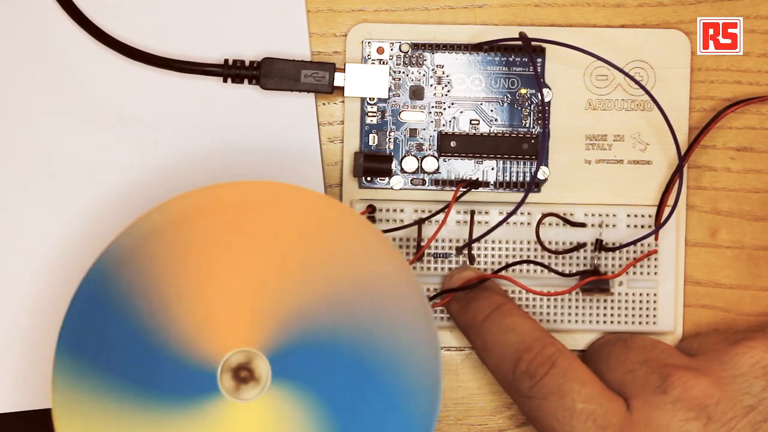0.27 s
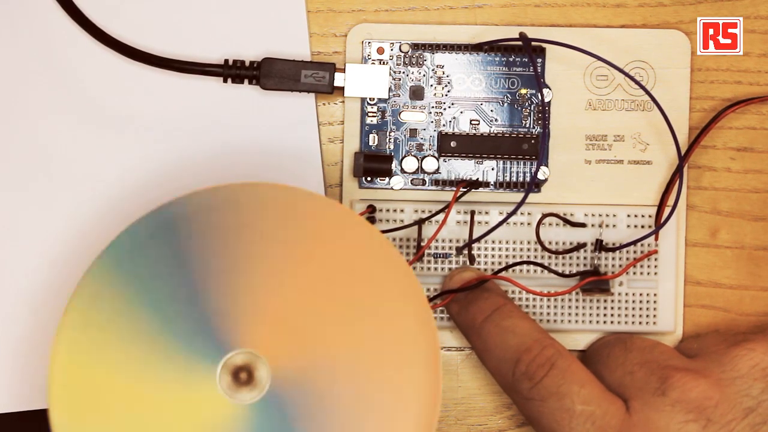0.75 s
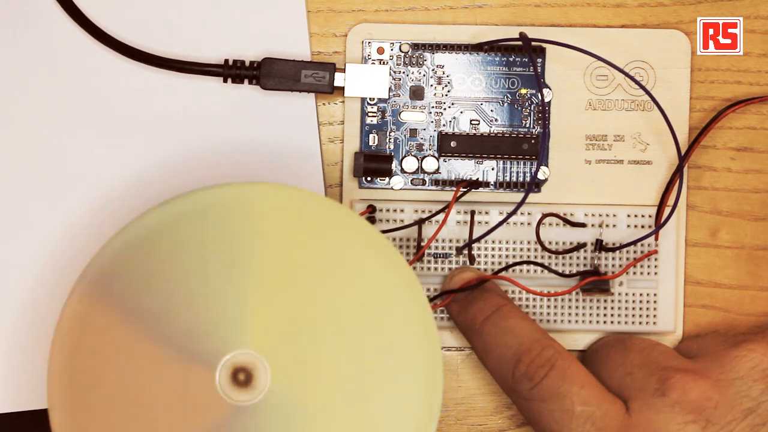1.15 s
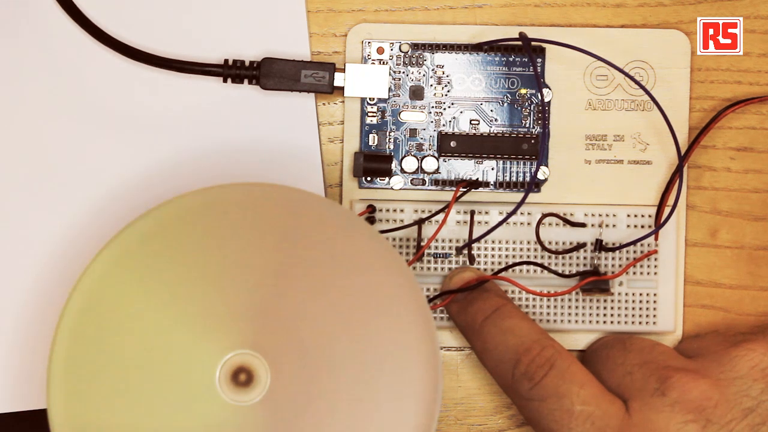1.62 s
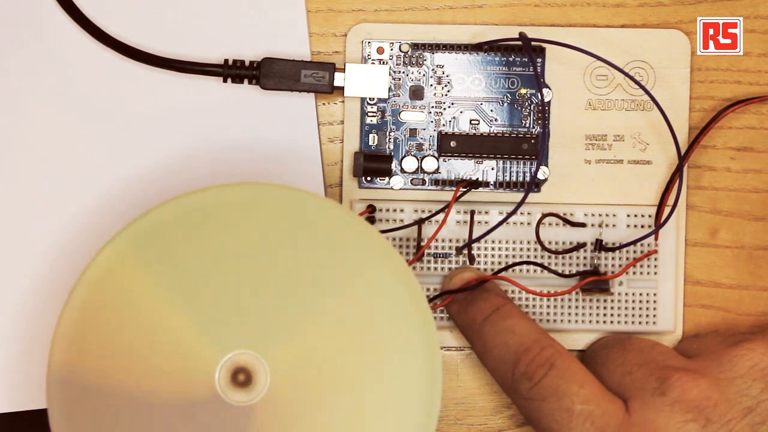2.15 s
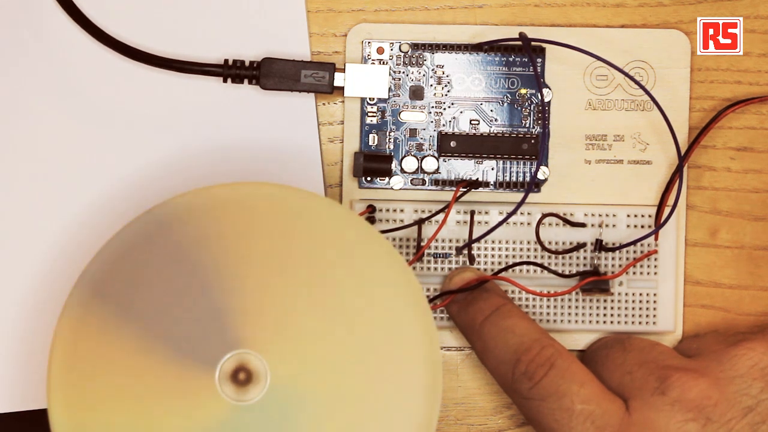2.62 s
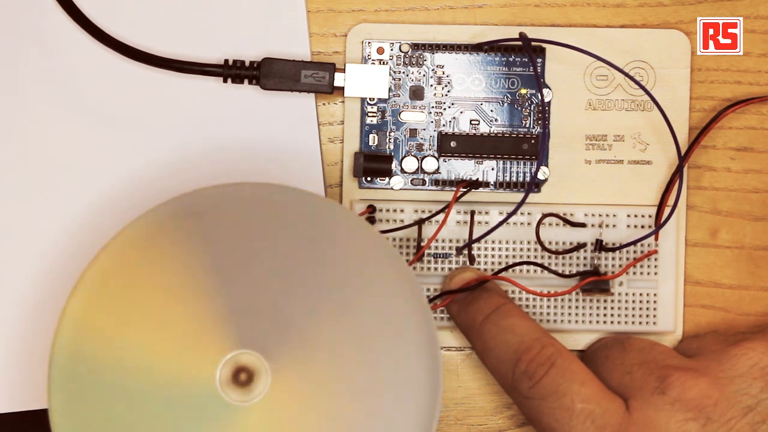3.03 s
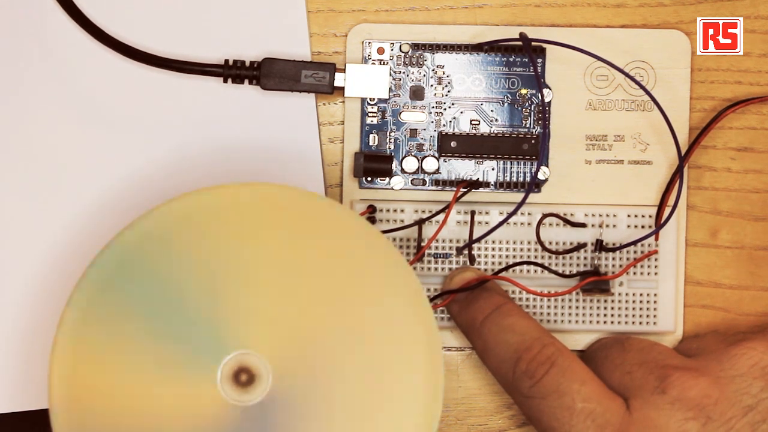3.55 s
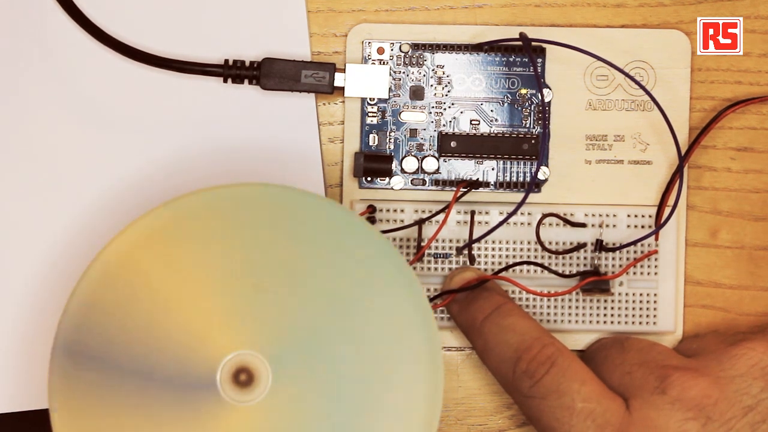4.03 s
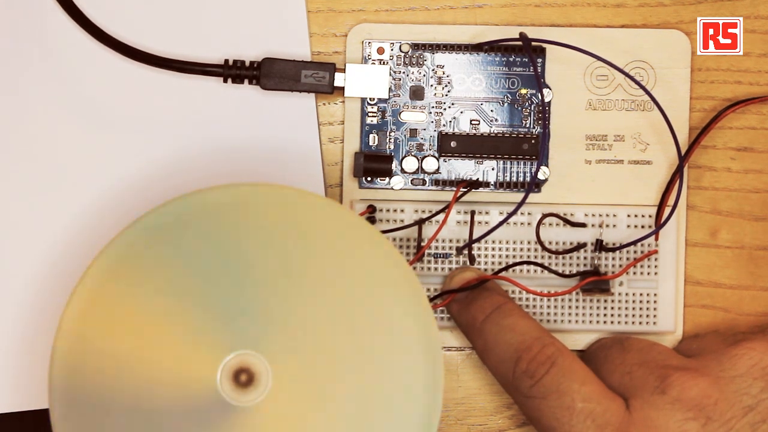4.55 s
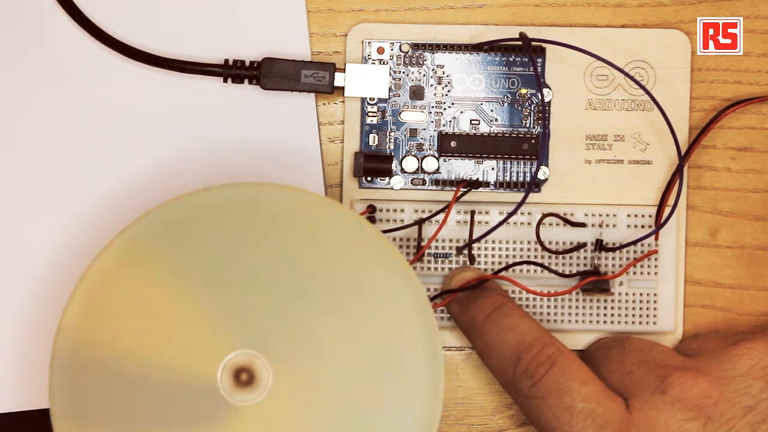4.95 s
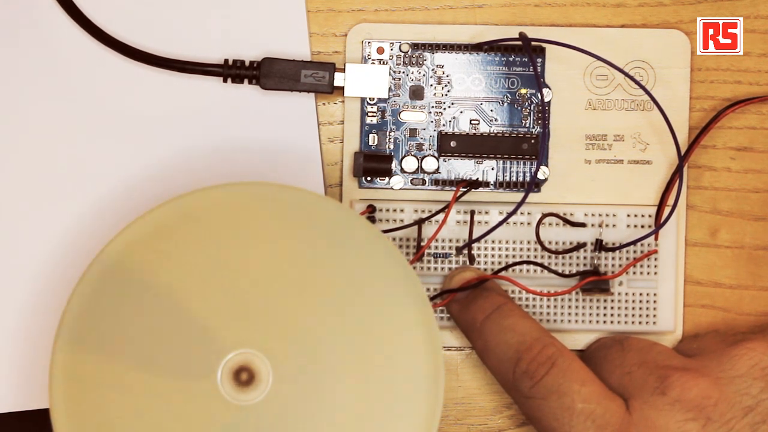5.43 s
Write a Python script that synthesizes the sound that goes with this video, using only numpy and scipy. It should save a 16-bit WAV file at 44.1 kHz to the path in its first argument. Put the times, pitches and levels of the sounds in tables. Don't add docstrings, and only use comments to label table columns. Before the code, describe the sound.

From 0 to 1.24 s a small electric motor starts a light disc slipping on its shaft. A loud, nasal, harmonic-rich squeal near 700 Hz creeps to about 728 Hz, brightening, its throb accelerating from about 3 to 19 pulses a second, with rough friction scrapes and rising brush hiss. At 1.24 s the hub grabs: the squeal drops and stops with a dull, quiet thud, a faint groan and a short dying ring. The motor bogs, then from 1.36 to 1.6 s its tones sweep quickly upward. After that a quieter, steady buzzing whine remains, with fine high lines around 10-12 kHz, airy hiss, a low hum near 450 Hz falling gradually below 400, and grainy hub rattle fluttering 20 to 40 times a second. The whine sags slightly in pitch. From about 4.1 s light knocks and ticks grow clearer. It is still running when it ends at 5.7 s. Close, dry, faint room rumble.

```python
import sys
import numpy as np
from scipy import signal
from scipy.fft import rfft, irfft
from scipy.io import wavfile

SR = 44100
rng = np.random.default_rng(int(sys.argv[2]) if len(sys.argv) > 2 else 0)


def bounce(signal):
    frames = np.transpose(np.atleast_2d(signal))
    limited = np.clip(frames, -1, 1)
    pcm = np.round(limited * 32767).astype(np.int16)
    wavfile.write(sys.argv[1], SR, pcm)


def rack_gain(trim_db):
    fader = np.asarray(trim_db, float)
    return 10 ** (fader / 20)


N = 250488
TIME_S = np.arange(N) / SR
START_N = round(1.3 * SR)
CATCH_S = 1.243
GRIP_S = 1.36
KNOCK_FROM_S, KNOCK_RISE_S = 4.13, .62


def rms_one(x):
    return x / np.sqrt(np.mean(x ** 2) + 1e-20)


def in_time(rows):
    s, *columns = np.transpose(rows)
    return [np.interp(TIME_S, s, c) for c in columns]


def ramp(start_s, length_s):
    return np.clip((TIME_S - start_s) / length_s, 0, 1)


def swell(s, at_s, length_s):
    return np.exp(-((s - at_s) / length_s) ** 2)


def peak(hz, top_hz, width_hz):
    return 1 / (1 + (2 * (hz - top_hz) / width_hz) ** 2)


def angle(hz):
    return 2 * np.pi * np.cumsum(hz) / SR


def drift(rate_hz, at=np.arange(N)):
    r = np.exp(-40 * np.pi * rate_hz / SR)
    chance = rng.standard_normal(at[-1] // 20 + 3002)
    slow = rms_one(signal.lfilter([1], [1, -2 * r, r * r], chance)[3000:])
    return np.interp(at / 20, np.arange(len(slow)), slow)


def coloured(spectrum):
    hz = np.arange(1, N // 2 + 2) * SR / N
    top_hz, db = np.transpose(spectrum)
    shape = rack_gain(np.interp(np.log(hz), np.log(top_hz), db, -90, -90))
    return rms_one(irfft(rfft(rng.standard_normal(N)) * shape, N))


def resonate(x, hz, width_hz):
    r = np.exp(-np.pi * width_hz / SR)
    poles = [1, -2 * r * np.cos(2 * np.pi * hz / SR), r * r]
    return signal.lfilter([(1 - r * r) / 2, 0, (r * r - 1) / 2], poles, x)


def room_air():
    # f/Hz, level/dB per Hz
    air = [(10, -50), (20, -24), (45, -20), (64, -14), (78, -5), (95, -4), (115, -8), (125, -15),
           (200, -13), (300, -15), (450, -22), (900, -60)]
    return rack_gain(-66.5) * coloured(air)


def mains_hum():
    return rack_gain(-67 + 2.9 * drift(1.7)) * np.sin(angle(np.full(N, 100)) + .5 * drift(.64))


def rumbles():
    # t/s, length/s, level/dB
    passes = [
        (0.69, 0.14, -65.5),
        (2.038, 0.12, -61.5),
        (2.287, 0.12, -57.5),
        (2.488, 0.12, -61.5),
        (4.84, 0.16, -59.5),
        (5.35, 0.23, -68),
    ]
    gain = sum(rack_gain(db) * swell(TIME_S, at_s, length_s) for at_s, length_s, db in passes)
    band = signal.butter(3, [160, 390], "band", fs=SR, output="sos")
    return gain * rms_one(signal.sosfilt(band, rng.standard_normal(N)))


def room_tail(x):
    t60_s = .22
    s = np.arange(round(.4 * SR)) / SR
    tail = rng.standard_normal(len(s)) * rack_gain(-60 * s / t60_s) * (s > .004)
    tail = signal.lfilter([.5], [1, -.6], tail)
    return signal.fftconvolve(x, tail / np.sqrt(np.sum(tail ** 2)))[:N]


def edge_tone():
    # t/s, f/Hz, level/dB
    tone = [
        (0, 875, -47),
        (.07, 885, -69),
        (.12, 925, -62),
        (.35, 965, -72),
        (.6, 1000, -69),
        (1.0, 1035, -80),
        (1.24, 1050, -74),
        (1.26, 1050, -100),
    ]
    hz, level_db = in_time(tone)
    return np.sqrt(2) * rack_gain(level_db + 3 * drift(5.7)) * np.sin(angle(hz) + 1.1 * drift(21))


def taps(disc):
    # taps per turn, disc angle/rad, ring f/Hz, width/Hz, peak level/dB
    hub_taps = [
        (1, 5.8, 1450, 90, -58),
        (2, 0.3, 2983, 154, -60),
    ]
    out = 0
    for per_turn, rad, hz, width_hz, db in hub_taps:
        clicks = np.diff(np.floor(round(per_turn) * (disc - rad) / (2 * np.pi)), prepend=0) > 0
        strength = rack_gain(db + 3.1 * rng.standard_normal(N)) * ramp(KNOCK_FROM_S, KNOCK_RISE_S)
        hits = clicks * strength * SR / (np.pi * width_hz) + 1e-18
        out = out + 2.7 * resonate(resonate(hits, hz, width_hz), hz, width_hz)
    return out


def rattle(disc, level_db):
    # f/Hz, width/Hz, level/dB
    body = [(496, 317, 0), (965, 138, -3), (1400, 564, 5.5), (1755, 820, -3.5), (2140, 330, -1.5),
            (2798, 580, -0.5), (3730, 490, -14), (4520, 470, -12), (5370, 400, -14.5), (6520, 380, -5)]
    coupled = TIME_S > 1.25
    knocks_per_s = 1000
    knocks = rng.standard_normal(N) * (.48 + 2 * (rng.random(N) < knocks_per_s / SR))
    throb_db = 1.5 * (np.cos(disc + 2.95) + np.cos(2 * disc + 2.96))
    knocks *= rack_gain(throb_db + 1.05 * drift(41))
    rings = []
    for k, (hz, width_hz, db) in enumerate(body):
        ring = resonate(resonate(knocks, hz, width_hz), hz, width_hz)
        rings.append((-1) ** k * rack_gain(db) * ring * np.sqrt(300 / width_hz))
    for k in range(5, len(body)):
        tick_rad = .25 if k == 5 else 5
        rings[k] *= 1 + coupled * 1.7 * np.exp(4 * (np.cos(disc - tick_rad) - 1))
    knock = .55 * ramp(KNOCK_FROM_S, KNOCK_RISE_S)
    rings[2] *= 1 + knock * (2 * np.exp(3.4 * (np.cos(disc) - 1)) - .5)
    rings[5] *= 1 + .6 * knock * np.cos(2 * disc - 1.1)
    rings[0] *= .25 + .75 * coupled
    rings[1] *= .3 + .7 * coupled
    return rack_gain(level_db) * rms_one(sum(rings))


def chafes():
    # t/s, peak level/dB
    rubs = [(0.0209, -49), (0.0463, -38), (0.12, -42), (0.1476, -40), (0.198, -29), (0.2394, -44),
            (0.3012, -49), (0.3501, -33), (0.4673, -34), (0.5293, -39), (0.6, -29), (0.6528, -45),
            (0.6893, -41), (0.7546, -44), (0.8047, -45), (0.84, -25), (0.907, -20), (0.9685, -19),
            (0.995, -34), (1.0365, -10), (1.0709, -29), (1.1004, -12), (1.132, -30), (1.1827, -38),
            (1.2071, -13)]
    delay_s, length_s = .004, .006
    gain = sum(rack_gain(-52 + .55 * (db + 35)) * swell(TIME_S[:START_N], at_s + delay_s, length_s)
               for at_s, db in rubs)
    return np.pad(gain, (0, N - START_N))


def brushes(rate_hz, disc, level_db, gripped):
    # f/Hz, level/dB per Hz
    spectrum = [(2650, -33), (4500, -6), (5000, -26), (5440, -5), (6540, -3), (6960, -2.5), (7530, -3.5),
                (8240, -2.5), (9900, -1), (10400, 4.5), (11500, 4), (14400, -9.5), (15800, -2)]
    # depth 0-1, f/Hz, width/Hz
    dull_spots = [(.55, 8250, 450), (.5, 7050, 300)]
    step = angle(rate_hz)
    pulse = 1 + .13 * np.sin(step) + .45 * np.sin(2 * step)
    hiss = rms_one(pulse * coloured(spectrum))
    fill, thinning = .57 * resonate(hiss, 11700, 13000), .5 * resonate(hiss, 9100, 2800)
    hiss += gripped * (fill - thinning)
    for depth, hz, width_hz in dull_spots:
        hiss -= depth * resonate(hiss, hz, width_hz)
    throb_db = -2 * gripped * np.cos(disc + .5)
    return (rack_gain(level_db + throb_db + .5 * drift(28)) + chafes()) * hiss


def low_tones(rate_hz, disc_hz):
    # multiple of commutator rate, of disc speed, early level/dB, late level/dB
    beats = [(2, -3, -22, -17), (2, -1, -20, -14), (2, 0, -17, -15), (2, 1, -10, -14), (2, 2, -18, -13),
             (3, -3, -19, -10), (3, -2, -19, -11), (3, 2, -16, -18), (7, -7, -14, -7), (8, -8, -18, -11),
             (4, -2, -18, -18), (4, -3, -15, -18), (4, 1, -16, -14), (6, -2, -10, -26), (6, -1, -13, -16),
             (6, 0, -3, -10), (6, 1, -14, -11), (6, 2, -17, -12), (12, -1, -19, -15), (12, 1, -19, -15)]
    # multiple of flutter, of hub tone, level/dB
    mixes = [(2, 0, -10), (1, 1, -6), (-1, 2, -6)]
    hub_hz = 2 * (rate_hz - disc_hz)
    hub_db = -54.5 + .35 * drift(1.3) + .8 * drift(12)
    octave_db = -67 + 9 * peak(2 * hub_hz, 815, 60) + 2.6 * drift(10)
    fade_db = np.minimum(2 * np.maximum(TIME_S - 1.69, 0) ** 2, 16.5)
    flutter_gain = ramp(1.41, .25) * rack_gain(-57.5 - fade_db)
    late = ramp(1.5, 3.2)
    motor, disc, hub = angle(rate_hz), angle(disc_hz), angle(hub_hz)
    flutter = .769 * hub
    out = rack_gain(hub_db) * np.sin(hub) + rack_gain(octave_db) * np.sin(2 * hub) + flutter_gain * np.sin(flutter)
    for k, m, early_db, late_db in beats:
        beat_db = -65.5 + 10 * ramp(1.25, .25) + early_db + (late_db - early_db) * late
        out += rack_gain(beat_db + 1.5 * drift(3)) * np.sin(k * motor + m * disc + .25 * drift(8))
    for k, m, db in mixes:
        out += flutter_gain * rack_gain(db + drift(1)) * np.sin(k * flutter + m * hub + 1.6 * drift(6.1))
    return np.sqrt(2) * out


def whine(rate_hz, disc, level_db):
    # f/Hz, width/Hz, level/dB
    casing = [(740, 100, -14), (1480, 150, -12), (2200, 150, -20), (2900, 400, -20), (4400, 300, -25),
              (6600, 300, -15), (7350, 120, -7), (8800, 1100, -11), (10550, 300, 0), (11250, 350, -2),
              (12100, 400, -4), (13300, 800, -9), (15000, 1300, -11)]
    # multiple, early level/dB, late level/dB
    odd_ones = [(3, 3, 4), (14, -8, -8), (15, -6, -2), (16, -8, -8), (17, -9, -9), (19, -8, -8),
                (20, -8, -8), (21, -10, -8), (22, -8, -6), (27, 1, -3), (28, -8, -2), (30, -2, 1),
                (33, -3, 3), (35, 0, -3), (40, 0, -5), (41, -4, 0), (46, -3, -3), (53, -2, -2), (39, 4, 2),
                (50, -3, 0), (55, -1, 4), (56, -2, -5), (61, -5, -1), (63, -5, -3), (31, 7, -1),
                (37, -2, -4), (38, -4, -2), (49, -8, -4), (58, -6, -7), (4, -14, -10), (5, -14, -12),
                (6, -25, -25), (12, -5, -5), (7, -6, -6), (8, -8, -8), (9, 3, 10), (11, -6, -6),
                (29, 2, -8), (34, -5, -1), (42, 5, -2), (43, 5, 0), (45, 5, 5), (47, -4, 7), (48, -5, -4),
                (51, -2, 8), (52, -3, -2), (54, 1, 0), (57, -4, 1), (60, -1, -2)]
    # multiple, t/s, length/s, level/dB
    passing = [(29, 3.2, 1.0, -9), (34, 3.2, .7, -11), (37, 3.3, .7, -10), (58, 3.3, .8, -9),
               (61, 2.9, .6, -6), (62, 2.9, .4, -8), (30, 3.6, .6, 3), (31, 3.5, .5, 3), (33, 4.3, .8, 2),
               (33, 1.9, .5, -4), (53, 4.0, .6, 5), (53, 5.2, .5, -6), (41, 3.6, .6, 3), (47, 4.0, .7, -5),
               (47, 5.6, .4, 4), (34, 5.5, .6, 6), (42, 4.5, .5, 3), (42, 5.6, .4, -5), (43, 5.5, .5, -6),
               (36, 5.6, .4, -6), (31, 5.6, .4, -7), (55, 2.1, .6, -6), (55, 5.6, .4, -5),
               (61, 5.6, .4, -10), (62, 5.6, .4, -6), (46, 4.4, .8, -4), (51, 3.3, .9, -3),
               (40, 5.0, .8, -4), (56, 1.9, .5, -6), (9, 3.8, .4, 2), (9, 2.9, .4, -3)]
    phase, out = angle(rate_hz) + .01 * drift(15), 0
    coarse = np.arange(0, N, 256)
    s = coarse / SR
    late = np.clip((s - 2.4) / 2.4, 0, 1)
    odd_db = {round(k): early_db + (late_db - early_db) * late for k, early_db, late_db in odd_ones}
    for k, at_s, length_s, db in passing:
        odd_db[k] = odd_db.get(k, 0) + db * swell(s, at_s, length_s)
    shimmer_db = 3 * swell(s, 3.84, .68) * np.cos(disc[coarse] + .3)
    heard = np.arange(round((GRIP_S - .01) * SR), N)
    for k in range(3, 69):
        hz = k * rate_hz[coarse]
        lit = sum(rack_gain(2 * db) * peak(hz, top_hz, width_hz) for top_hz, width_hz, db in casing)
        own_db = 2.5 * (k % 3 == 0) + odd_db.get(k, 0) + shimmer_db * (hz > 10300)
        own_db = own_db - 8 * peak(hz, 10945, 80)
        own_db = own_db + 1.1 * (.5 * drift(.25, coarse) + drift(7.1, coarse))
        blur = 1 + .04 * drift(25, coarse) + .15 * rng.standard_normal(len(coarse))
        gain = np.interp(heard, coarse, np.sqrt(lit) * rack_gain(own_db) * blur)
        out = out + gain * np.sin(k * phase[heard] + rng.uniform(0, 2 * np.pi))
    return rack_gain(level_db) * np.pad(out, (heard[0], 0))


def after_ring():
    # f/Hz, level/dB, t60/s
    modes = [
        (700, -54.5, 0.68),
        (1450, -62, 0.5),
        (2180, -66, 0.37),
    ]
    at = np.arange(round(1.7 * SR))
    after_s = at / SR - CATCH_S
    tones = 0
    for hz, db, t60_s in modes:
        gain = rack_gain(db - 60 * np.maximum(after_s, 0) / t60_s + 3.4 * drift(30, at))
        tones = tones + gain * np.sin(2 * np.pi * hz * after_s + .94 * drift(30, at))
    return np.sqrt(2) * ramp(CATCH_S, .004) * np.pad(tones, (0, N - len(at)))


def catch():
    after_s = TIME_S - CATCH_S
    hz = 400 + 190 * np.exp(-np.maximum(after_s, -.03) / .012)
    thud = rack_gain(-51.5) * swell(TIME_S, CATCH_S, .005)
    groan = rack_gain(-66) * ramp(CATCH_S, .045) * (1 - ramp(1.37, .023))
    return np.sqrt(2) * (thud + groan) * rack_gain(4 * drift(40)) * np.sin(angle(hz) + .7 * drift(66))


def scrape(slip, turn, level_db, tilt_db):
    # f/Hz, width/Hz, level under squeal/dB, growth/dB per s
    disc_rings = [(1846, 220, -24.5, -7), (2973, 160, -27.5, 16.5), (4410, 190, -24, 8.5),
                  (5140, 200, -39, 8.0), (5950, 280, -21.5, 5.5), (6540, 140, -21.5, 15.5)]
    grit = resonate(rng.standard_normal(START_N), 2960, 1800) * (1 + 2.8 * np.cos(slip))
    out = rack_gain(level_db - 19.5 + 2.2 * tilt_db) * rms_one(grit)
    for hz, width_hz, db, growth_db in disc_rings:
        ring = resonate(rng.standard_normal(START_N), hz, 1.5 * width_hz)
        ring = rms_one(resonate(ring, hz, width_hz))
        ring_db = level_db + db + growth_db * TIME_S[:START_N] + 4.4 * np.cos(2 * turn - 1.1)
        out += rack_gain(ring_db) * ring
    return out


def squeal(disc):
    # t/s, f/Hz, level/dB
    track = [
        (0, 699.3, -34.5),
        (.3, 705.7, -35),
        (.6, 717.2, -36.5),
        (.9, 727.6, -37.5),
        (1.2, 728, -38),
        (1.236, 720, -36.5),
        (1.243, 661, -57),
        (1.252, 620, -100),
    ]
    # multiple, level/dB, upper minus lower side line/dB, steady part/dB,
    # growth/dB per s
    partials = [(1, -0.5, -7.5, 9.5, -2), (2, -4.5, -2, -9.5, 5), (3, -14, 15, 33.5, -1),
                (4, -9, -14, 18.5, -1.5), (5, -17.5, -17, 56, 5), (6, -19.5, 26, 31.5, -4),
                (7, -22.5, -1, 40, -2.5), (8, -19.5, -16, 24, -2), (9, -20, -20.5, 28, -3),
                (10, -31, 2, 10, -2), (12, -25, 4, 12, -6), (13, -31, -2, 10, -9), (14, -27, 2, 10, -9),
                 (15, -27, -4, 15, -9), (16, -21, -3, 15, -13), (17, -30, -5, 10, -9),
                 (18, -29, -4, 10, -9)]
    facing_rad = [2.44, 3.06, 1.1, 5.6, 4.1, 2.65, 5.6, 2.3, 2.2]
    # depth/dB, twice the disc angle/rad
    half_turn = [(-0.94, 1.1), (-2.3, 0.1), (0.9, 2.6), (1.4, 0.26), (4.5, 1.6), (4, 2.94), (5.5, 3.5),
                 (2.5, 0.75), (5.5, 2.9)]
    at = np.arange(START_N)
    s, turn = at / SR, disc[:START_N]
    hz, level_db = (c[:START_N] for c in in_time(track))
    tilt_db = -.99 + 2.5 * s
    steady = .011 + .63 * np.exp(-(s / .43) ** 2)
    rotor_turn = angle(37.5 + 10.5 * s)
    slip = angle(hz) + .12 * np.sin(rotor_turn + .7)
    slip += .36 * np.sin(2 * turn + 5.02) + .3 * np.sin(turn + 4.42)
    wander = .085 * drift(25, at)
    rotor_lines = .2 * np.exp(1j * rotor_turn) + .034 * np.exp(2j * rotor_turn)
    out = np.zeros(N)
    for k, db, lean_db, steady_db, growth_db in partials:
        k = round(k)
        place = (k - 1) % len(facing_rad)
        facing = np.exp(1j * (turn + facing_rad[place]))
        half_db, half_rad = half_turn[place]
        share = steady * rack_gain(steady_db)
        throb = .6 * rack_gain(lean_db / 2) * facing + .6 * rack_gain(-lean_db / 2) / facing + share
        throb = throb / np.sqrt(.72 + share ** 2) + rotor_lines
        own_db = level_db + db + growth_db * s + tilt_db * np.log2(k)
        own_db = own_db + half_db * np.cos(2 * turn - half_rad) + np.sqrt(k) * drift(108, at)
        rough = min(k, 8) * (wander + .065 * drift(100, at))
        line = (throb * np.exp(1j * (k * slip + rough))).real
        out[:START_N] -= np.sqrt(2) * rack_gain(own_db) * line
    out[:START_N] += scrape(slip, turn, level_db, tilt_db)
    low_cut = signal.butter(3, 560, "high", fs=SR, output="sos")
    return signal.sosfilt(low_cut, out + 1e-18)


def loose_disc(motor):
    # f/Hz, width/Hz, depth 0-1
    dead_spots = [(2460, 150, 0.9), (4070, 110, 0.4), (5270, 170, 0), (6720, 300, 0.2)]
    loose = TIME_S < CATCH_S
    motor = motor + edge_tone() - .65 * loose * resonate(motor, 1075, 410)
    for hz, width_hz, depth in dead_spots:
        motor -= depth * loose * resonate(motor, hz, width_hz)
    return motor


def scene():
    # t/s, level/dB
    effort = [
        (0, -53),
        (.7, -46.5),
        (1.22, -43.5),
        (1.26, -54.5),
        (1.36, -50),
        (1.47, -44),
        (3, -43),
        (3.8, -43.5),
        (5.68, -44),
    ]
    # t/s, f/Hz
    commutator = [(1.37, 181), (1.41, 210), (1.45, 229.8), (1.47, 236.5), (1.51, 243.4), (1.58, 247.7),
                  (1.68, 249.7), (1.8, 250.7), (1.97, 251.2), (2.4, 249.4), (2.55, 248), (2.7, 247.6),
                  (3.1, 244.6), (3.55, 243.6), (4.5, 238.5), (5.1, 232.5), (5.4, 231), (5.68, 230.2)]
    # t/s, turns per s
    disc_speed = [(0, 2.77), (.3, 6.53), (.6, 11.03), (.9, 14.39), (1.25, 19.03), (1.6, 20.2), (2.6, 24),
                  (3.6, 28.5), (4.6, 33.8), (5.68, 40.4)]
    (brush_db,), (rate_hz,), (disc_hz,) = in_time(effort), in_time(commutator), in_time(disc_speed)
    disc = angle(disc_hz)
    gripped = ramp(GRIP_S, .04)
    rattle_db = -51 + .61 * (brush_db + 41) + gripped * (1.5 - 1.34 * (TIME_S - GRIP_S))
    hiss_db = brush_db - 8.5 * ramp(GRIP_S + .04, .14)
    settling_db = 1.5 * np.clip((1.56 - TIME_S) / .15, 0, 1)
    whine_db = brush_db - 8.6 + settling_db + 1.5 * np.cos(disc + .3)
    tones = gripped * (whine(rate_hz, disc, whine_db) + low_tones(rate_hz, disc_hz))
    slipping = squeal(disc) + catch() + after_ring()
    noise = brushes(rate_hz, disc, hiss_db, gripped) + rattle(disc, rattle_db)
    motor = loose_disc(tones + slipping + noise + taps(disc))
    return (motor + rack_gain(-21) * room_tail(motor) + room_air() + mains_hum() + rumbles())[None]


def low_pass(x):
    return signal.sosfilt(signal.butter(12, 16920, fs=SR, output="sos"), x)


def record(dry):
    band_limit = signal.ellip(12, .5, 70, 15750, fs=SR, output="sos")
    return low_pass(signal.sosfilt(band_limit, dry))


dry = scene()
out = record(dry)
bounce(out)
```